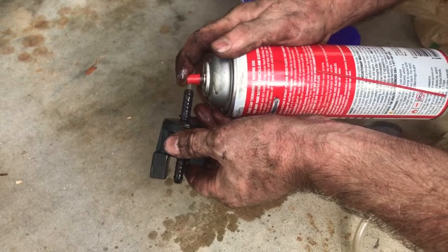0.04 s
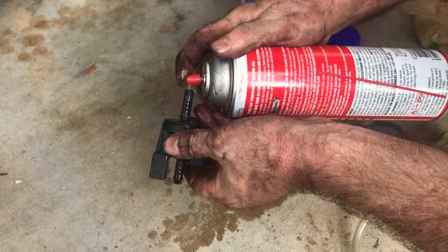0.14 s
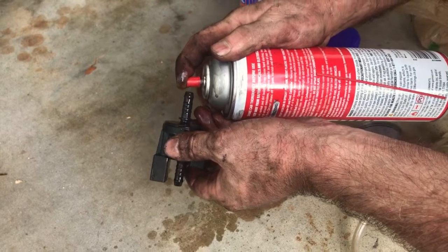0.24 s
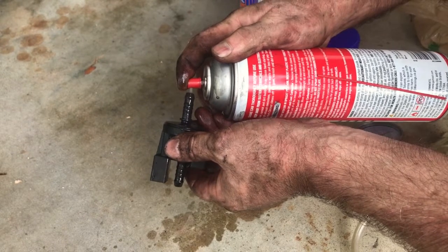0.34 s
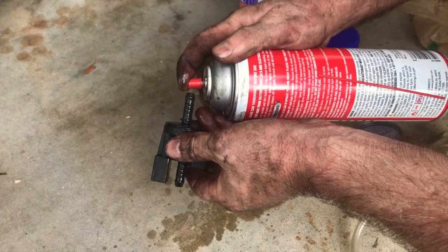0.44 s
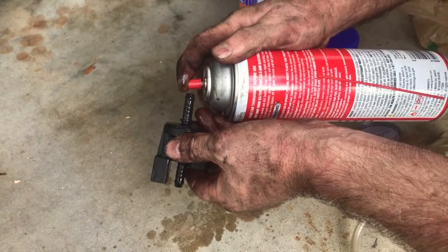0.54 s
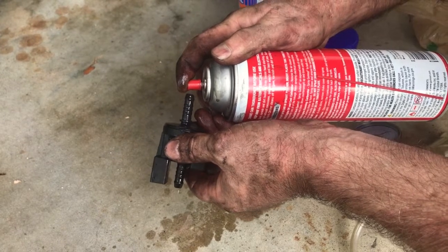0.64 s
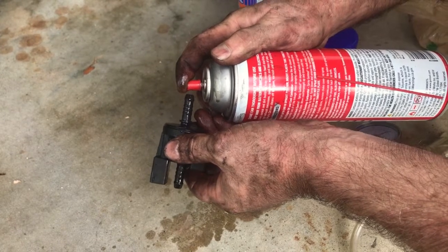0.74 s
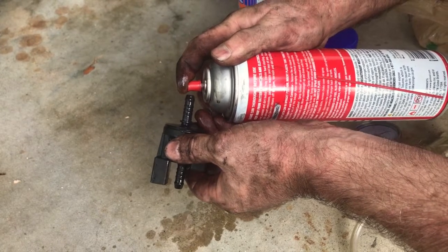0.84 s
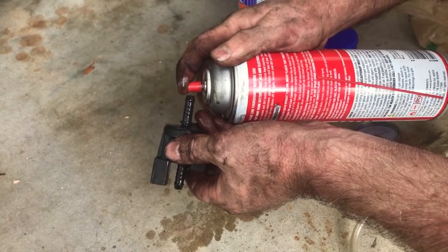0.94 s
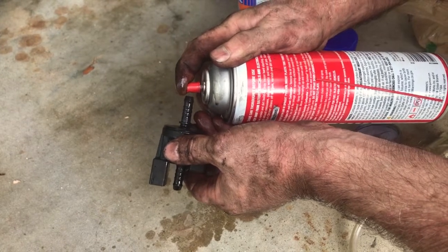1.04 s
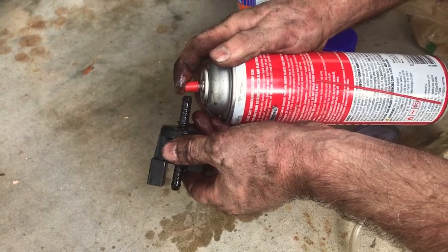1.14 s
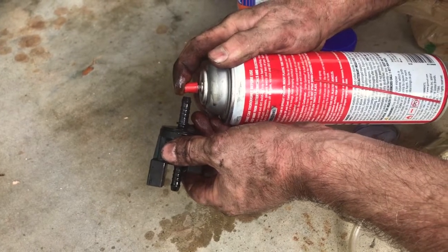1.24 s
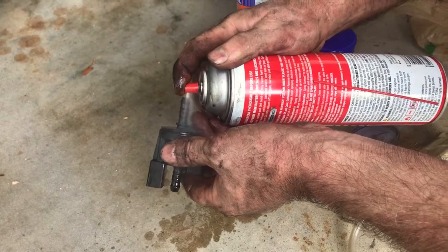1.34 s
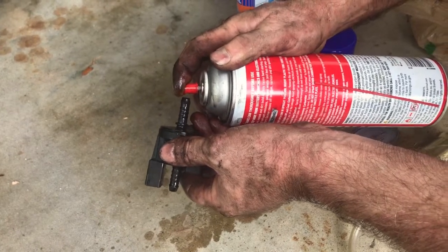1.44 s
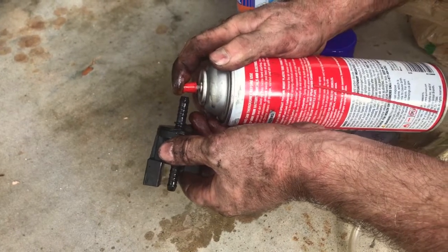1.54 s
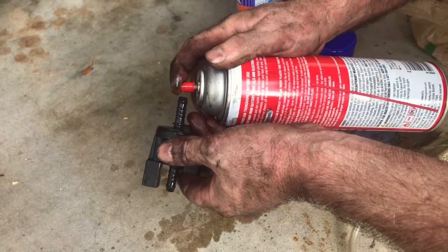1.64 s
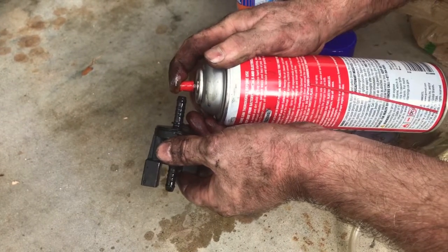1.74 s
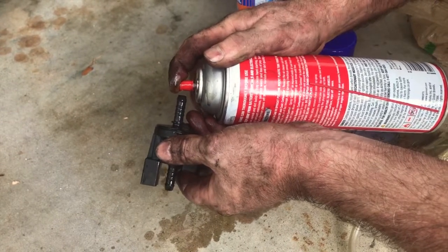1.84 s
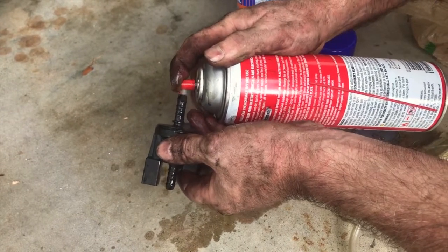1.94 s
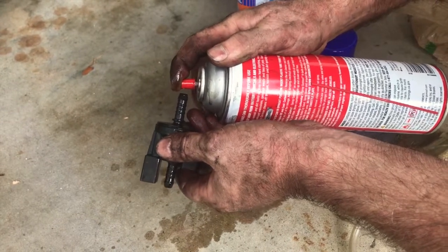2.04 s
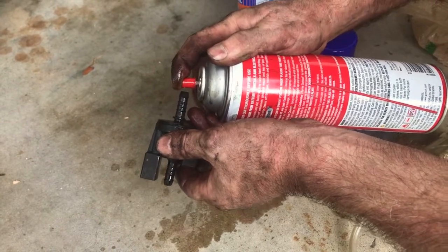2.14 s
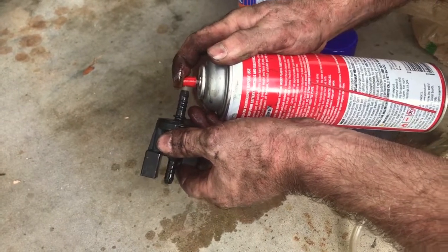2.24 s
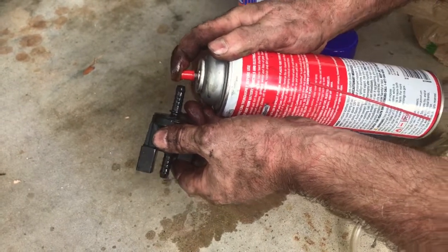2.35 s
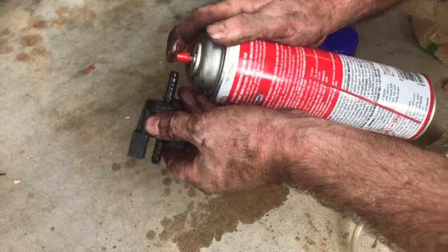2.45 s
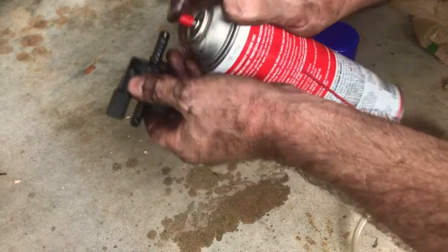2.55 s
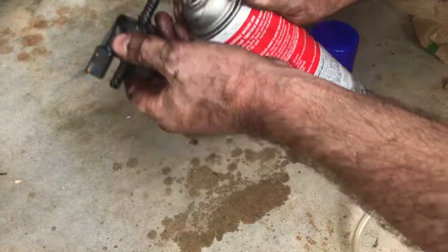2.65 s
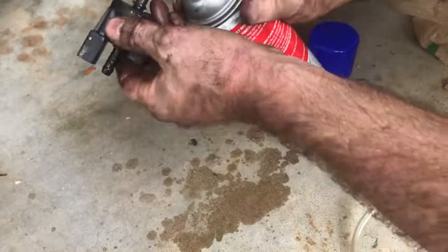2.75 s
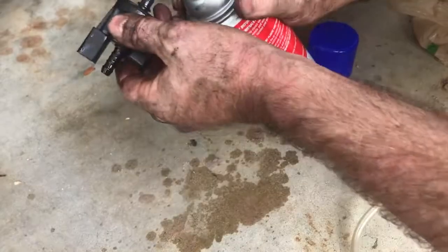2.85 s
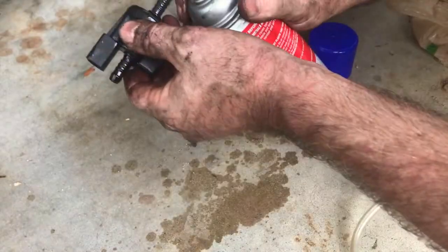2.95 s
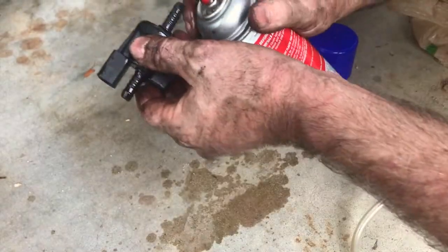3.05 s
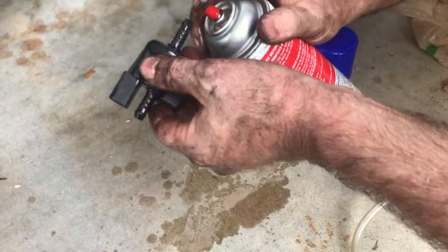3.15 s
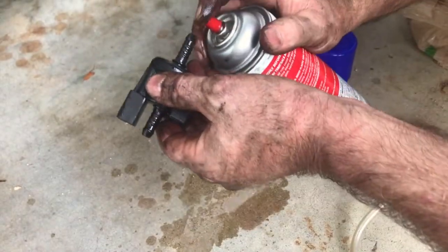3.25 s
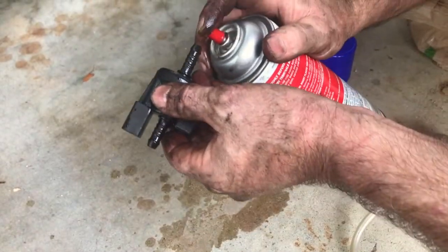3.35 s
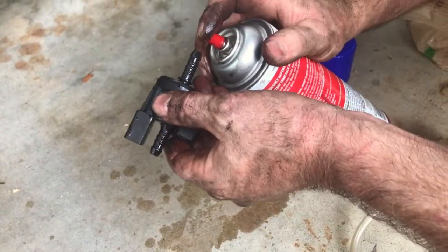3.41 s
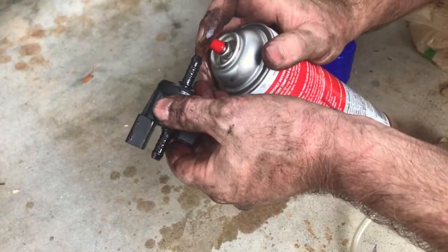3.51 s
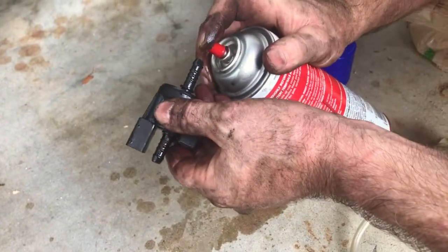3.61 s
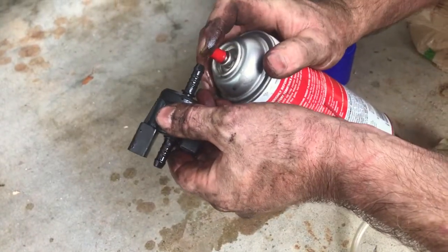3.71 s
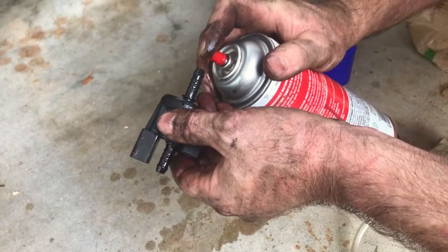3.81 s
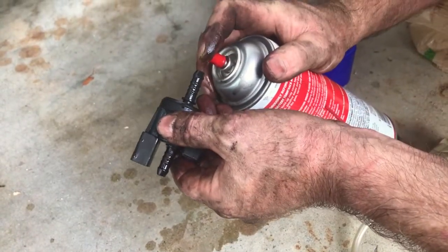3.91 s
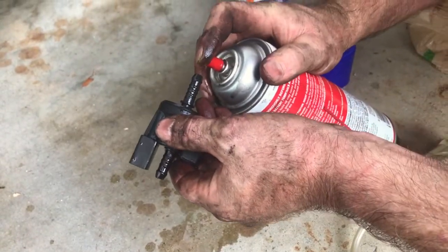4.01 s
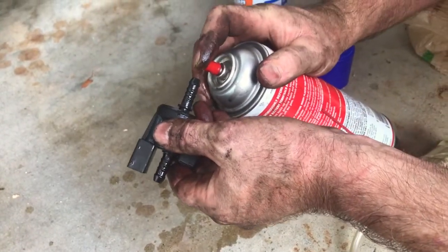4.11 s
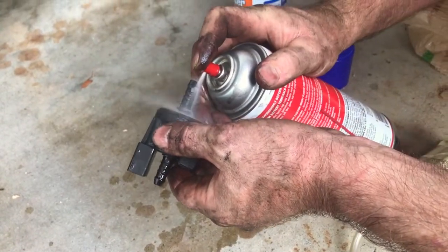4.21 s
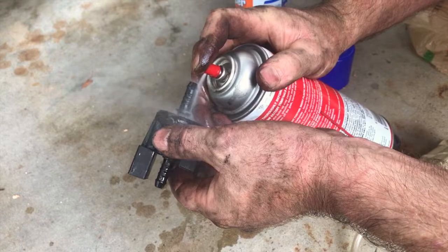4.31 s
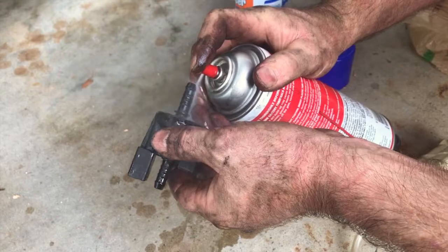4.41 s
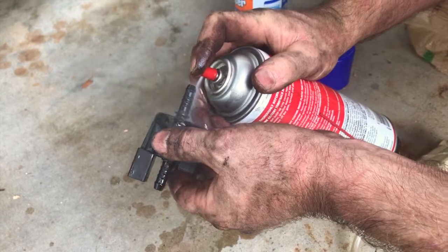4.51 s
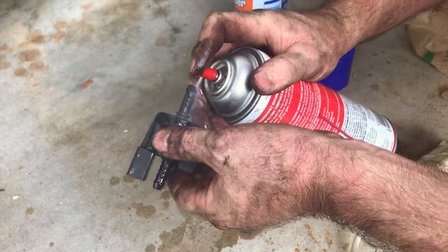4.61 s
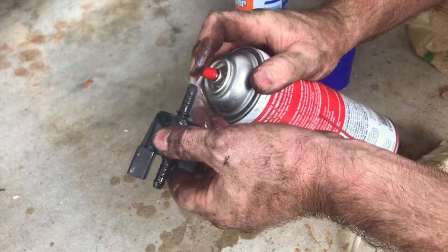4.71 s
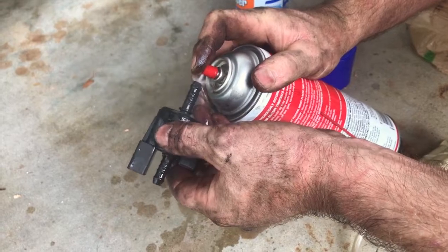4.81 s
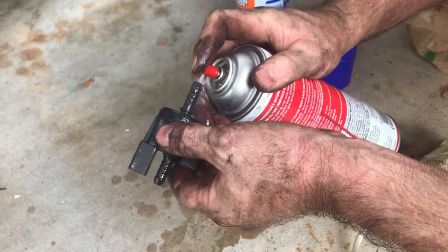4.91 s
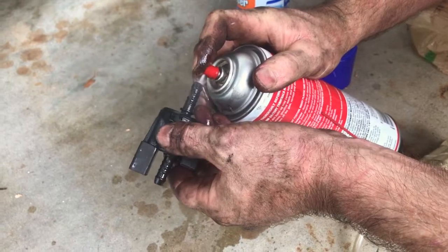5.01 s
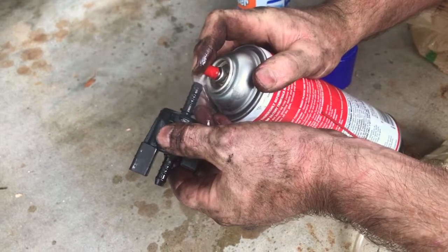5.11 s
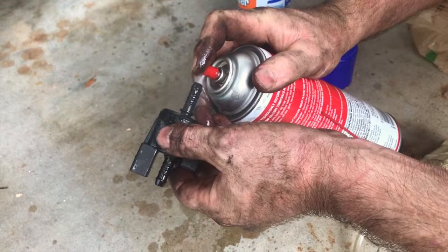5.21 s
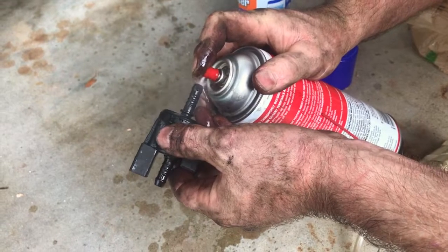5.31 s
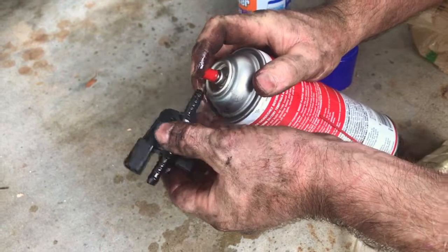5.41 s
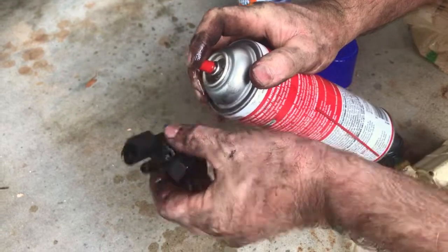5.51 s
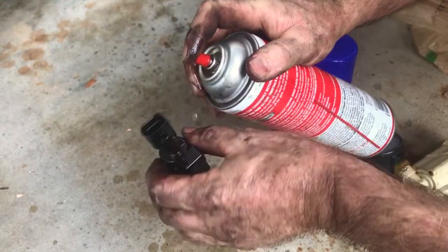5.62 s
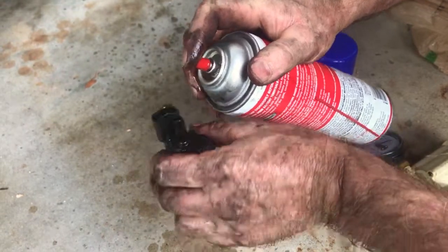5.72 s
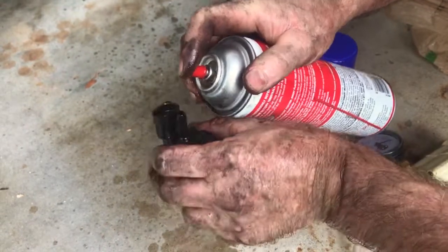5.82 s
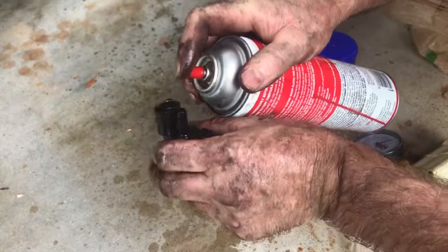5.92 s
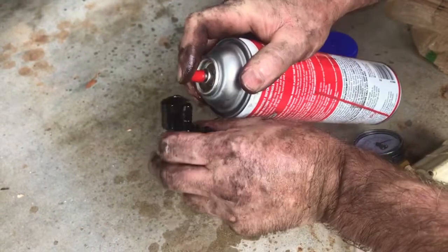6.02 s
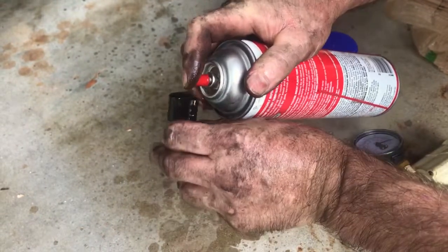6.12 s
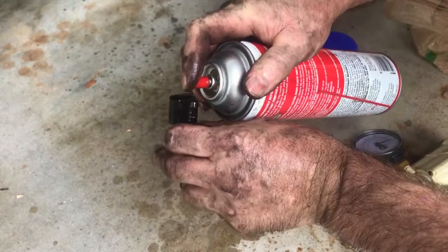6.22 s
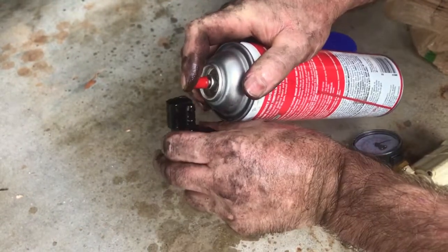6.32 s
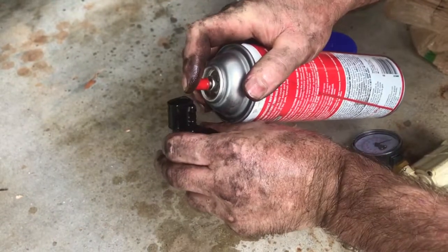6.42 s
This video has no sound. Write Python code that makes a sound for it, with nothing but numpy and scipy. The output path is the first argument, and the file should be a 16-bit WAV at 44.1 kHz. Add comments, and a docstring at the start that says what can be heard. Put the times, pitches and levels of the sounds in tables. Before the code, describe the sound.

An aerosol can hisses thinly, fires three hard, loud spurts into a small part, then sprays a long steady stream, with light handling taps in a garage.

```python
"""Aerosol cleaner on a small car part

Close up in a garage, a can sprays a part held in the hand: a thin jet, three hard spurts into its hollows,
then a long steady stream. The jet is noise with droplet clicks, coloured by where it is aimed; low noise roars
in the hollows, the barely open valve sizzles and edges whistle as fuzzy gliding tones. Hands rub and tap
over a short room tail, a low rumble and hum. A limiter holds the spurts down."""
import sys
import numpy as np
from scipy import signal
from scipy.fft import rfft, irfft
from scipy.io import wavfile
from scipy.ndimage import uniform_filter1d, minimum_filter1d

SR = 44100
rng = np.random.default_rng(int(sys.argv[2]) if len(sys.argv) > 2 else 0)


def digitize_waveform(pressure):
    """Quantize a signal to 16-bit integers and store it at the path in sys.argv[1].

    Rows of a 2-D input are taken as channels; values are limited to [-1, 1].
    """
    field = np.atleast_2d(pressure).T
    bounded = np.clip(field, -1, 1)
    quanta = np.round(bounded * 32767).astype(np.int16)
    wavfile.write(sys.argv[1], SR, quanta)


N = 284886
TIME = np.arange(N) / SR
FREQS = np.fft.rfftfreq(N, 1 / SR)
# rise and release are the times to cover EDGE_DB; EASE rounds the ramp
EDGE_DB, EASE = 40, 1.31


def gain_of(db):
    """Decibels to amplitude."""
    return 10 ** (np.asarray(db) / 20)


def evened(x):
    """Scales to unit rms."""
    return x / np.sqrt(np.mean(x ** 2) + 1e-20)


def read(points):
    """Interpolates a spectrum in dB on a log-frequency axis."""
    hz, db = np.transpose(points)
    return np.interp(np.log(FREQS + 1), np.log(hz + 1), db)


def noise(colour):
    """Unit noise of a given spectrum."""
    white = rfft(rng.standard_normal(N))
    return evened(irfft(white * gain_of(read(colour)), N))


def wander(hz):
    """Unit random drift up to a given rate."""
    white = rfft(rng.standard_normal(N))
    return evened(irfft(white / (1 + (FREQS / hz) ** 4), N))


def gesture(start, end, db, rise, release, growth_db=0):
    """Amplitude over time of one rise, hold and release."""
    before = np.maximum((start - TIME) / rise, 0)
    after = np.maximum((TIME - end) / release, 0)
    outside = before + after
    heard, out = outside < 2, np.zeros(N)
    held = np.interp(TIME[heard], [start, end], [0, 1])
    out[heard] = gain_of(db + growth_db * held - EDGE_DB * outside[heard] ** EASE)
    return out


def level(rows, *shared):
    """Gestures added in power; shared values complete each row."""
    return np.sqrt(sum(gesture(*row, *shared) ** 2 for row in rows))


def fuzzy_tone(hz, width_hz):
    """Unit turbulence in one resonance: a tone whose two quadratures drift at random."""
    phase = 2 * np.pi * np.cumsum(hz) / SR
    return evened(wander(width_hz) * np.cos(phase) + wander(width_hz) * np.sin(phase))


# Jet colours, one for each way the jet meets the part. Each holds a slope: pitch_hz, level_db;
# then resonances and notches: pitch_hz, width_hz, peak_db;
# and for the three hard spurts low_hz, below which the hiss falls away
THIN = ([(650, -21), (1300, -9), (2500, -5.5), (4500, -9), (6500, -14.5), (9500, -2), (12500, 0),
         (15600, -1)], [(1330, 140, 4.5), (1885, 200, -8), (2220, 160, -14), (2870, 88, 4), (3010, 90, -15),
         (3270, 73, -8), (3460, 150, 5), (3730, 150, 3), (4400, 390, 10), (6740, 250, 8), (8120, 700, 2.5),
         (8600, 250, -11), (9300, 150, -7), (10400, 400, -5), (11090, 420, -12), (12800, 400, -7),
         (15500, 250, -9)])
GRAZING = ([(650, -17.5), (1300, -9), (2500, -3), (4500, -8), (6500, -13), (9500, -4), (12500, -6),
            (15600, 0)], [(1030, 190, -6), (1860, 150, -7), (2260, 150, -13), (3030, 80, -11),
            (3270, 150, -4), (3450, 80, 7), (4436, 250, 8), (4870, 250, -5), (7506, 400, -9),
            (8510, 250, -6), (9000, 400, 4), (9800, 150, 9.5), (10000, 80, -9), (10940, 700, -11),
            (12040, 250, -6), (12680, 80, -13), (14750, 700, -9)])
POCKET = ([(650, -12), (1300, -2), (2500, -6), (4500, -1), (6500, 0), (9500, -1), (12500, -1), (15600, -2)],
           [(1030, 400, -10), (2500, 530, 12.5), (2900, 140, 7), (4480, 250, 9), (5380, 700, 4.5),
           (5990, 250, -9), (7540, 700, -7), (8530, 250, -9.5), (9390, 760, 6)])
FIRST_SPURT = ([(650, -6), (1300, -4), (2500, -0.5), (4500, -7.5), (6500, -5), (9500, -7), (12500, -1),
                (15600, -6.5)], [(2130, 700, -4.5), (3450, 150, 3), (4010, 150, 5), (4446, 320, 6),
                (7050, 150, 4), (8200, 400, 3), (9860, 700, 5), (12920, 250, -6), (13820, 700, 6)], 1600)
SOFT_SPURT = ([(650, -19), (1300, -6), (2500, -12), (4500, -0.5), (6500, -8), (9500, 0.5), (12500, -8),
               (15600, -1)], [(1120, 230, -5), (2200, 510, 14), (4050, 150, 6), (4478, 400, 10.5),
               (7600, 770, -9), (8520, 250, -8), (10210, 250, -8), (12400, 400, 7), (13390, 400, 7)])
SECOND_SPURT = ([(650, -3), (1300, -8.5), (2500, 0.5), (4500, -4), (6500, -6), (9500, -3), (12500, -4),
                 (15600, -4.5)], [(1200, 530, 4), (2210, 400, -5), (4360, 150, 9), (6720, 700, 6),
                 (7620, 400, -4), (9520, 700, 4.5), (9950, 130, 7), (12530, 250, 8), (13520, 800, 5)], 1600)
THIRD_SPURT = ([(650, -8), (1300, -8), (2500, -1), (4500, -5), (6500, -9), (9500, -6), (12500, 0),
                (15600, -6)], [(1670, 150, -4.5), (2070, 700, -6.5), (4480, 250, 7), (6800, 700, 7),
                (8200, 450, 11), (10400, 760, -7), (11020, 250, -8), (12300, 290, 7), (14340, 700, -6)],
                1300)
MIST = ([(650, -23), (1300, -26), (2500, -24), (4500, -20), (6500, -28.5), (9500, -0.5), (12500, -16),
         (15600, 0)], [(1250, 150, 3.5), (3340, 810, 7), (4440, 150, -6), (5990, 250, 6), (6930, 820, 8.5),
         (8060, 250, 6), (9900, 250, -6), (10470, 700, -7.5), (13570, 250, -8)])
STREAM = ([(650, -20), (1300, -8.5), (2500, -8.5), (4500, -4), (6500, -5.5), (9500, 0.5), (12500, -3),
           (15600, 0)], [(1064, 170, -7), (1427, 130, -7), (1715, 80, -9), (2080, 97, -2),
           (2260, 270, -5.5), (2850, 88, -6), (3920, 150, -7), (4260, 150, 1.5), (5040, 250, -2.5),
           (5680, 400, -7), (6500, 150, -9), (8930, 650, -6.5), (10050, 700, -5), (10670, 250, -16),
           (11300, 400, 5.5), (12210, 250, -6), (14600, 700, 5.5)])
LATE_STREAM = ([(650, -22.5), (1300, -12.5), (2500, -10), (4500, -7), (6500, -6), (9500, -1), (12500, -2),
                (15600, -0.5)], [(1263, 136, 8.5), (1580, 130, 4.5), (1900, 160, 8.5), (2300, 80, -5),
                (2580, 150, 2), (4260, 230, 6.5), (4690, 140, 6), (5430, 650, -3.5), (7240, 170, 4),
                (8140, 140, 4.5), (8760, 380, -10), (9050, 150, -6), (10310, 720, -8.5), (11930, 360, -6),
                (13030, 700, 4.5), (14530, 390, 8.5), (15270, 150, -8)])
# Where the jet is aimed: halfway_s (middle of the move), move_s, colour
AIMS = [(-1, .1, THIN), (.58, .09, GRAZING), (1.105, .1, POCKET), (1.32, .02, FIRST_SPURT),
        (1.65, .02, SOFT_SPURT), (1.85, .04, MIST), (1.95, .012, SECOND_SPURT), (2.2, .02, THIRD_SPURT),
        (3.5, .1, MIST), (4.207, .011, STREAM), (4.9, .18, LATE_STREAM)]
# Reflections off the hands, can and floor: delay_s, gain
REFLECTIONS = [(.00111, .07), (.00234, .08), (.0029, .07), (.00365, -.07), (.0042, .06), (.0052, .06),
               (.0064, .05)]


def jet(drops_per_s=900, drop_share=.3, drop_spread_db=3, flutter_db=0.63, sputter_db=1.04,
        scatter=0.42, scatter_t60=.04):
    """Turbulent gas and droplet impacts, coloured by wherever the jet lands."""
    falls = rng.random(N) < drops_per_s / SR
    size_db = drop_spread_db * np.minimum(rng.exponential(1, N), 3)
    drops = falls * rng.choice([-1, 1], N) * gain_of(size_db)
    drive = evened(rng.standard_normal(N) + drop_share * evened(drops))
    # liquid and gas leave the nozzle unevenly
    uneven_db = flutter_db * wander(45) + sputter_db * wander(350)
    drive = rfft(evened(drive * gain_of(uneven_db)))
    # nearby surfaces comb the hiss into fine fixed ridges
    clutter = rng.standard_normal(N) * gain_of(-60 * TIME / scatter_t60) * (TIME > .003)
    clutter = rfft(clutter / np.linalg.norm(clutter))
    echoes = sum(gain * np.exp(-2j * np.pi * FREQS * delay) for delay, gain in REFLECTIONS)
    drive = drive * (1 + echoes + scatter * clutter)
    hiss = np.zeros(N)
    for halfway, move, colour in AIMS:
        arrived = np.clip((TIME - halfway) / move + .5, 0, 1)
        hiss = (1 - arrived) * hiss + arrived * irfft(drive * jet_colour(*colour), N)
    return hiss * flow()


def jet_colour(slope, resonances, low_hz=610, steep=3.3):
    """The slope with the resonances of the gap between nozzle, part and hand; unit power in the treble."""
    db = read(slope)
    for hz, width, peak_db in resonances:
        db = db + peak_db * 2 ** -((2 * (FREQS - hz) / width) ** 2)
    gain = gain_of(db) / np.sqrt(1 + (low_hz / (FREQS + 1)) ** (2 * steep))
    treble = (FREQS > 10000) & (FREQS < 16000)
    return gain / np.sqrt(np.mean(gain ** 2 * treble))


# The finger presses the nozzle; a push during a held press adds to its flow:
# open_s, let_go_s, treble_level_db, rise_s, release_s, growth_db (over the hold)
PRESSES = [(0, 1.135, -51, .01, .04, 3.5), (0, 0.243, -43, 0.013, 0.29, .5),
           (0.388, .505, -42, 0.04, .2, 2), (1.053, 1.135, -38, 0.058, 0.041, -1),
           (1.369, 1.378, -43.5, 0.033, .02, 11), (1.38, 1.491, -11, 0.0081, .025, -0.5),
           (1.76, 1.802, -33, 0.034, .12, -1.5), (1.854, 1.886, -49, .05, 0.047, -1),
           (1.991, 2.075, -10.5, 0.019, 0.027, -1), (2.286, 2.371, -11, 0.022, 0.07, -2),
           (3.927, 3.97, -61, 0.23, .05, 4), (3.987, 4.116, -48, 0.1, .05, 5.5),
           (4.126, 4.265, -43.5, 0.034, .05, 5.5), (4.283, 5.452, -34.5, .07, 0.071, 2.3),
           (4.284, 4.375, -32.5, 0.046, .12, 0.5)]
# The first spurt chokes for a moment: start_s, end_s, depth_db
CHOKE = (1.413, 1.432, -5)


def flow(choke_edge_s=.008):
    """Strength of the jet: the presses, less the brief choke."""
    start, end, depth_db = CHOKE
    choked = np.clip(np.minimum(TIME - start, end - TIME) / choke_edge_s + 1, 0, 1)
    return level(PRESSES) * gain_of(depth_db * choked)


# The jet is caught in a hollow: caught_s, freed_s, level_db (before gain_db in roar), rise_s, release_s
ROARS = [(1.4, 1.407, -19, .026, 0.026), (1.441, 1.488, -23.5, .018, 0.017),
         (1.996, 2.076, -22, .018, 0.015), (2.315, 2.35, -25.5, .05, 0.064)]
# Roar spectrum: pitch_hz, level_db
ROAR_COLOUR = [(25, -14), (50, -1), (130, -1.5), (250, 0), (560, 1.5), (850, 0.5), (1400, -1.5),
               (2100, -11), (4000, -30)]


def roar(lumps_db=3.0, gain_db=4.0):
    """Lumpy low turbulence when the full jet is caught in a hollow."""
    lumpy = evened(noise(ROAR_COLOUR) * gain_of(lumps_db * wander(110)))
    return level(ROARS) * lumpy * gain_of(gain_db)


# Gas sizzles through the barely open valve: start_s, end_s, level_db, rise_s
LEAKS = [(1.156, 1.16, -39.5, 0.027), (1.304, 1.32, -48, .003), (1.322, 1.378, -42, 0.032),
         (1.68, 1.72, -50, .005), (1.724, 1.75, -37.5, 0.038), (1.83, 1.908, -49, .03),
         (1.957, 1.985, -38.5, .005), (2.252, 2.262, -43.5, 0.041), (5.46, 5.502, -46.5, .05)]
# Sizzle spectrum: pitch_hz, level_db
LEAK_COLOUR = [(500, -40), (1900, -25), (2500, -6), (3500, 0), (4500, -8), (5400, -2), (6900, -2),
               (7700, -10), (9100, -5), (10500, -19), (14300, -22), (15300, -14), (16000, -17)]
LEAK_RELEASE_S = 0.051
# the drain starts relative to the press's treble level, then fades
DRAIN_DB, DRAIN_DB_PER_S = -23, 270


def valve(sputter_db=1.5):
    """Gas sizzles through the barely open valve, and as the stem drains after it shuts."""
    drain = np.zeros(N)
    for _, let_go, db, *_ in PRESSES:
        fading_db = db + DRAIN_DB - DRAIN_DB_PER_S * abs(TIME - let_go)
        drain += (TIME > let_go) * gain_of(fading_db)
    sizzle = evened(noise(LEAK_COLOUR) * gain_of(sputter_db * wander(200)))
    return np.hypot(level(LEAKS, LEAK_RELEASE_S), drain) * sizzle


# Gas blows across openings in nozzle and part, gliding as the aim shifts:
# start_s, end_s, first_pitch_hz, last_pitch_hz, level_db, rise_s
WHISTLES = [(1.027, 1.068, 2870, 2800, -45.5, 0.067), (1.092, 1.14, 2460, 2360, -41.5, .04),
            (1.153, 1.157, 5350, 5300, -38.5, .012), (1.723, 1.735, 2980, 2800, -44, 0.032),
            (1.761, 1.78, 4310, 4596, -33, .006), (1.783, 1.828, 2080, 2130, -46, .04),
            (2.002, 2.026, 9580, 9900, -25, .02), (2.045, 2.078, 6850, 6950, -23.5, .03),
            (5.592, 5.768, 4510, 4430, -72.5, .05)]
WHISTLE_RELEASE_S = .035


def whistles(width_hz=130):
    """Fuzzy edge tones, each gliding evenly from one pitch to another."""
    out = np.zeros(N)
    for start, end, first_hz, last_hz, db, rise in WHISTLES:
        hz = np.interp(TIME, [start, end], [first_hz, last_hz])
        out += gesture(start, end, db, rise, WHISTLE_RELEASE_S) * fuzzy_tone(hz, width_hz)
    return out


GUST_S, GUST_DB, GUST_RISE_S, GUST_RELEASE_S = 1.402, -23.5, 0.018, .18
GUST_HIGH_HZ, GUST_LOW_HZ, GUST_SINK_S = 235, 58.5, .02


def gust(width_hz=32):
    """A gust of gas thumps the microphone, its pitch sinking quickly as it spreads."""
    sink = np.exp(-np.maximum(TIME - GUST_S, 0) / GUST_SINK_S)
    hz = GUST_LOW_HZ + (GUST_HIGH_HZ - GUST_LOW_HZ) * sink
    return gesture(GUST_S, GUST_S, GUST_DB, GUST_RISE_S, GUST_RELEASE_S) * fuzzy_tone(hz, width_hz)


# Hands shift their grip: start_s, end_s, level_db
RUBS = [(1.2, 1.29, -71), (1.58, 1.675, -64.5), (2.47, 2.57, -65), (2.6, 2.815, -68.5),
        (2.755, 2.785, -69.5), (5.54, 5.868, -66.5), (5.7, 5.78, -63)]
# Rub spectrum: pitch_hz, level_db
RUB_COLOUR = [(250, -12), (600, -1), (1500, -1.5), (3000, -5), (6000, -6), (9000, -10.5), (15500, -13)]
RUB_RISE_S, RUB_RELEASE_S = .05, .04
# Fingers and part tap the can: time_s, peak_db, contact_pitch_hz
TAPS = [(2.571, -52.5, 1320), (2.572, -49, 3100), (2.814, -59, 7000), (3.004, -61, 3770), (3.01, -59, 9600),
        (3.089, -63, 3200), (3.159, -51, 8600), (3.161, -51, 6100), (3.163, -61.5, 3500),
        (5.603, -40.5, 2150), (5.708, -54, 6000), (5.722, -53, 3380), (5.773, -43, 4360),
        (5.835, -45.5, 1940)]
# Ringing modes of the can: pitch_hz, level_db, t60_s
CAN = [(2470, -19, 0.078), (4480, -26, .16), (5860, -31, .06)]


def hands(grain_db=2, crack_db=-7, crack_t60=0.031, contact_t60=0.018):
    """Skin rubs on can and part; each tap is a crack, a short knock and a faint ring of the can."""
    skin = evened(noise(RUB_COLOUR) * gain_of(grain_db * wander(150)))
    out = level(RUBS, RUB_RISE_S, RUB_RELEASE_S) * skin
    t = np.arange(SR // 4) / SR
    ring = sum(gain_of(db - 60 * t / t60) * np.sin(2 * np.pi * hz * t) for hz, db, t60 in CAN)
    band = signal.butter(2, [800, 7500], "band", fs=SR)
    for s, db, hz in TAPS:
        crack = evened(signal.lfilter(*band, rng.standard_normal(len(t))))
        crack = crack * gain_of(crack_db - 60 * t / crack_t60)
        knock = np.sin(2 * np.pi * hz * t) * gain_of(-60 * t / contact_t60)
        onset = 1 - np.exp(-t / 0.00074)
        tap = (crack + knock + ring) * onset
        part = out[round(s * SR):][:len(t)]  # a view, so adding to it adds to out
        part += gain_of(db) * tap[:len(part)] / abs(tap).max()
    return out


def garage(x, t60=0.26, treble_t60=.2, split_hz=8000,
           colour=((100, -16), (1000, -8), (3000, 0), (7000, -1), (15000, -3))):
    """A short diffuse tail from walls and concrete; its treble dies first."""
    tail = noise(colour)
    low = irfft(rfft(tail) / (1 + (FREQS / split_hz) ** 4), N)
    treble = tail - low
    tail = low * gain_of(-60 * TIME / t60) + treble * gain_of(-60 * TIME / treble_t60)
    tail = tail * (TIME > .007)
    return signal.fftconvolve(x, tail[:SR] / np.linalg.norm(tail))[:N]


# Rumble spectrum: pitch_hz, level_db (relative; RUMBLE_DB sets the whole)
RUMBLE = [(20, -50), (32, -23), (46, -3), (70, -3), (110, -2.5), (170, -11), (250, -21.5), (350, -26.5),
          (500, -33), (1000, -34), (2000, -41), (4000, -48.5), (9000, -53.5), (15500, -56)]
RUMBLE_DB = -52
# Mains hum: pitch_hz, level_db
HUM = [(59.5, -62), (118, -58.5)]


def background(waver=.9):
    """Low rumble as shaped noise, with a mains hum whose phase wavers."""
    hum = np.zeros(N)
    for hz, db in HUM:
        phase = 2 * np.pi * hz * TIME + waver * wander(1.7)
        hum += gain_of(db) * evened(np.sin(phase))
    return gain_of(RUMBLE_DB) * noise(RUMBLE) + hum


def scene(room_db=-26):
    """Spray and handling close to one microphone, the same in both channels."""
    near = jet() + roar() + valve() + whistles() + hands()
    mono = near + gain_of(room_db) * garage(near) + gust() + background()
    return np.array([mono, mono])


LIMIT_DB, LIMIT_RATIO, LIMIT_HOLD_S, RECOVER_DB_PER_S = -16.5, 9, .115, 55


def limiter(x):
    """Holds the hard spurts down, so the background sinks after them and swells back."""
    power = abs(uniform_filter1d((x ** 2).mean(0), size=400))
    power_db = 10 * np.log10(power + 1e-12)
    over_db = np.maximum(power_db - LIMIT_DB, 0) * (1 - 1 / LIMIT_RATIO)
    # keep the deepest cut for the hold time, then recover at a steady rate
    half = round(LIMIT_HOLD_S * SR / 2)
    held_db = -minimum_filter1d(-over_db, 2 * half + 1, origin=half)
    recovery_db = RECOVER_DB_PER_S * TIME
    cut_db = np.maximum.accumulate(held_db + recovery_db) - recovery_db
    return x * gain_of(-uniform_filter1d(cut_db, size=100))


EDGE_HZ = 15800


def record(dry):
    """Limits the level, then cuts the treble above EDGE_HZ with a steep low-pass."""
    lowpass = signal.firwin(511, EDGE_HZ, window=("kaiser", 9), fs=SR)
    return signal.oaconvolve(limiter(dry), lowpass[None], "same")


dry = scene()
out = record(dry)
digitize_waveform(out)
```